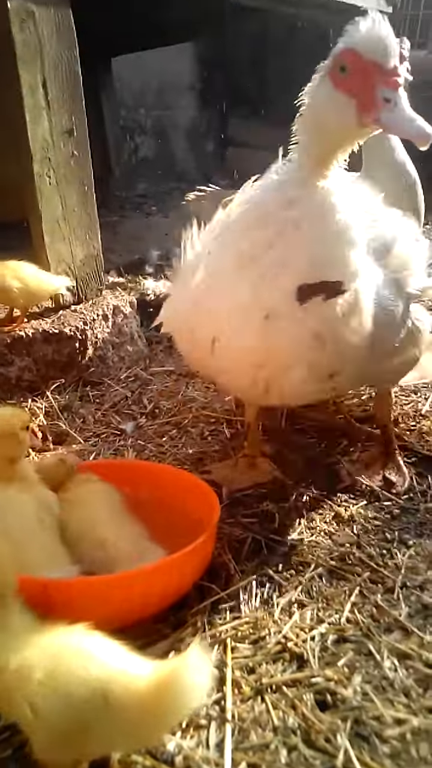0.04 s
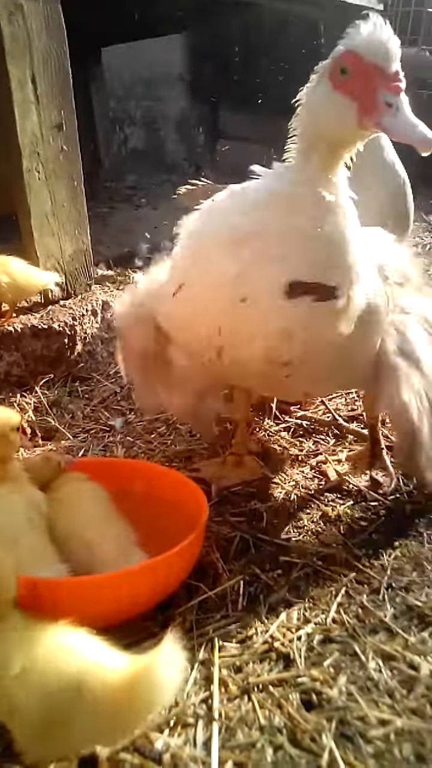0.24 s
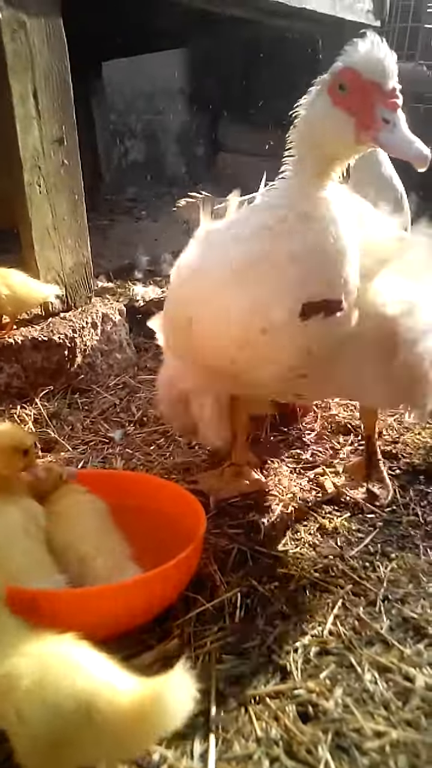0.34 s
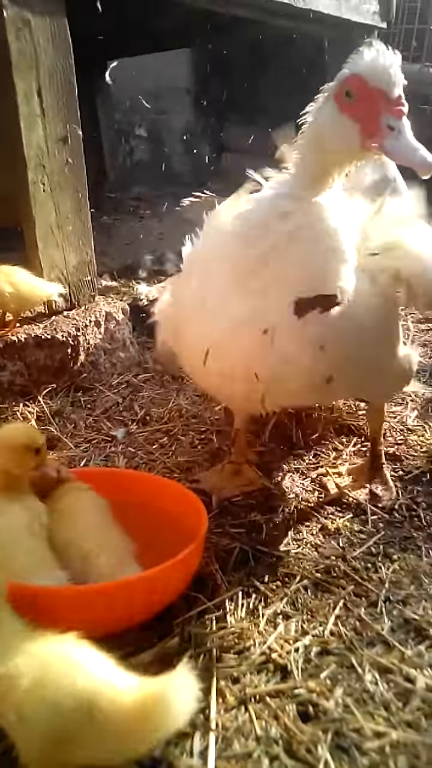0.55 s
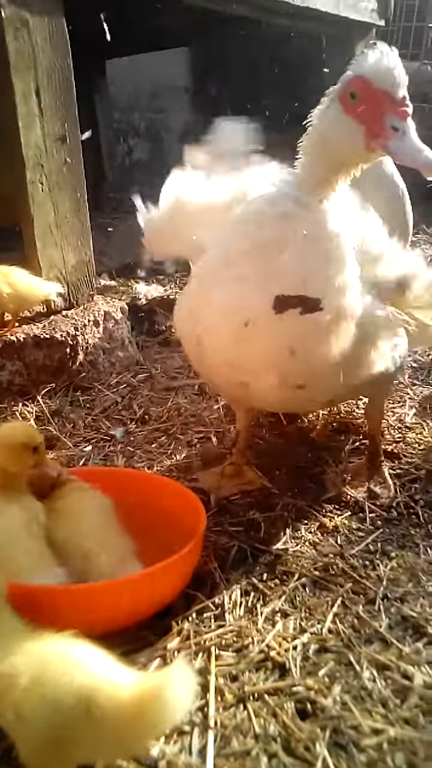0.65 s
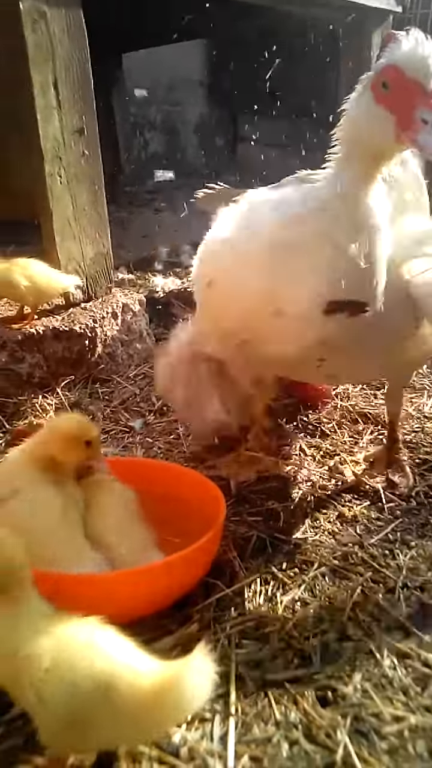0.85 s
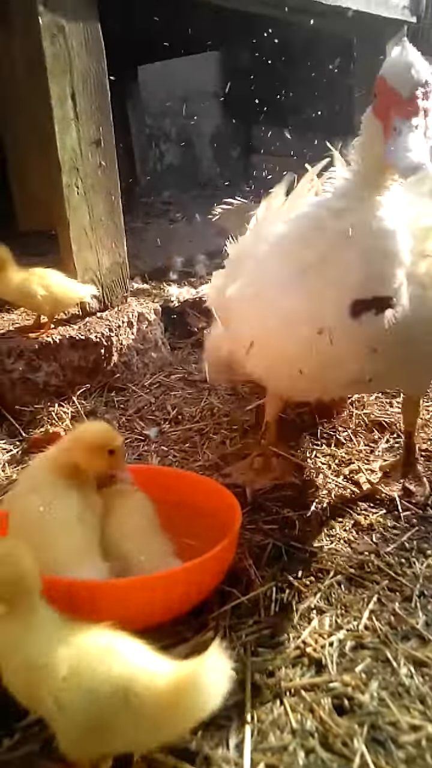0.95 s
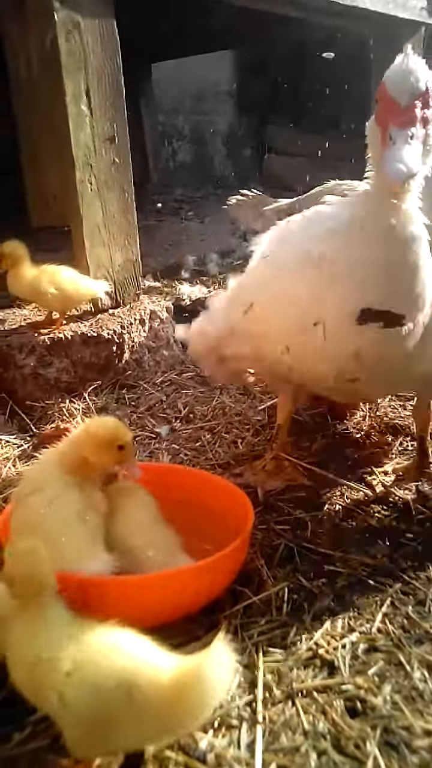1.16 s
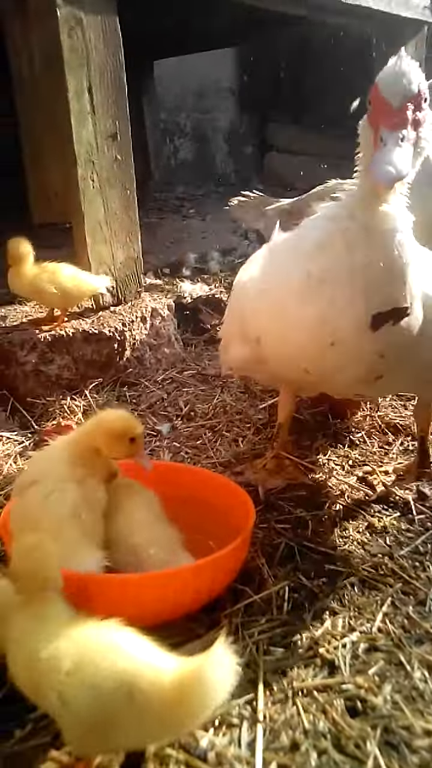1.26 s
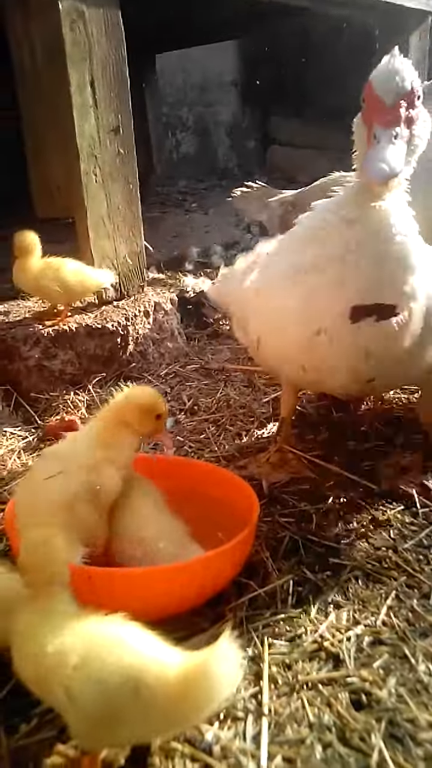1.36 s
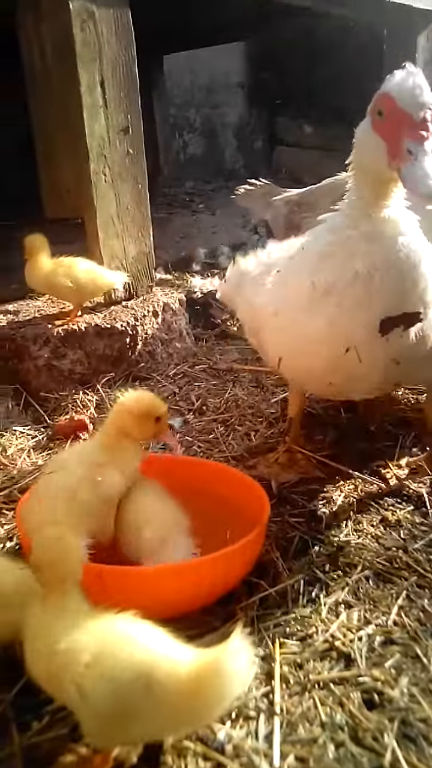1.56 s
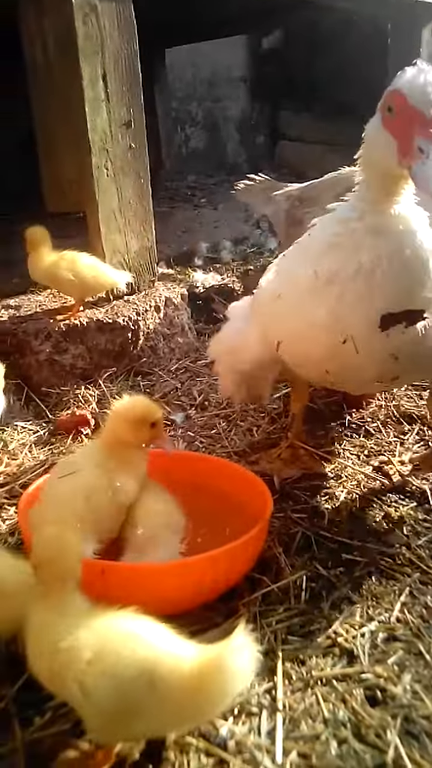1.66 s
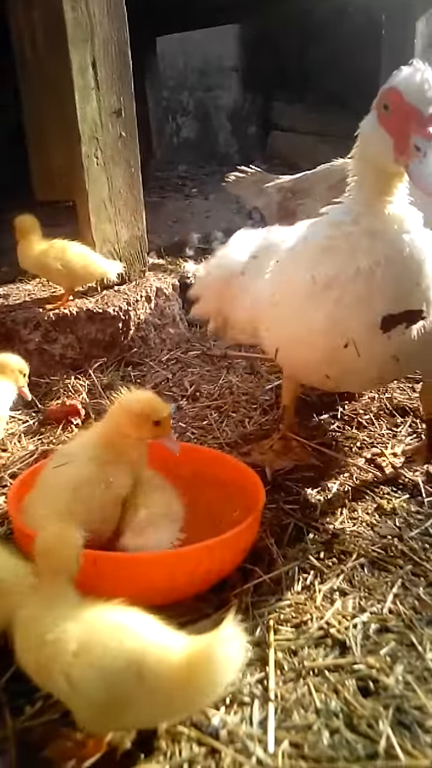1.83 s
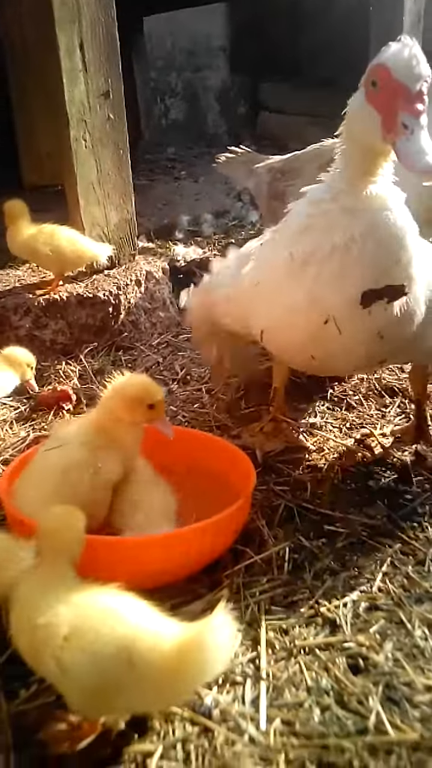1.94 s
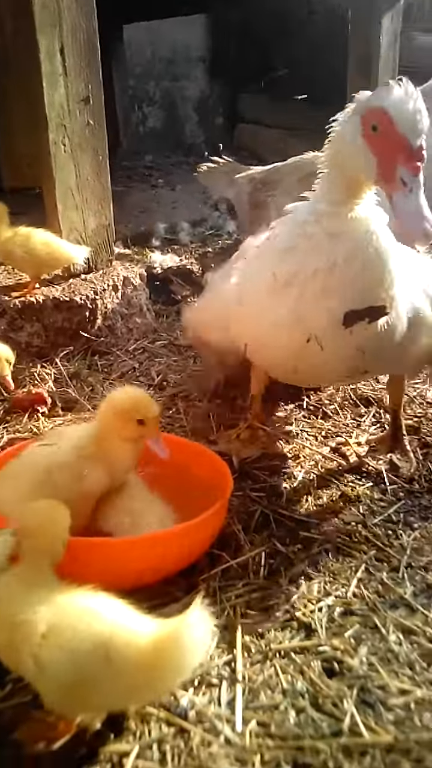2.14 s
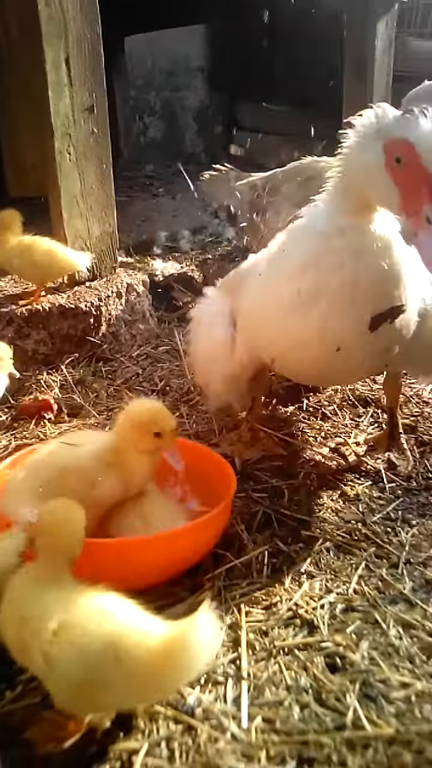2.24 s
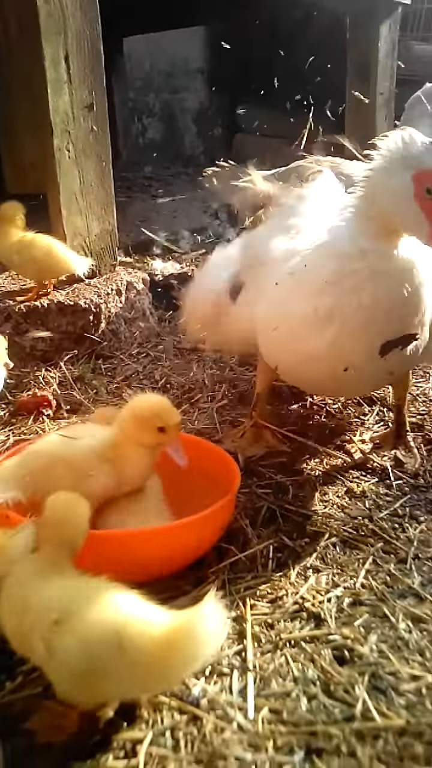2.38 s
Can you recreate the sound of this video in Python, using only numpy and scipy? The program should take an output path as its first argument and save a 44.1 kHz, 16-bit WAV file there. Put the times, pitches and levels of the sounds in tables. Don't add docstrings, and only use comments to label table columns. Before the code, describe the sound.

A large duck flaps close to a phone in an open, lightly echoing shed. From 0 to 1.3 s, ragged feathery slaps come rapidly, with wing brushes, straw rustle, dry snaps and low air puffs, strongest around 1 s. They die away by 1.7 s; a tiny rising gulp sounds at 1.8 s, with thin duckling peeps at 2.1-2.4 s and distant falling chick whistles. At 2.6 s a very loud, dead beak knock hits a plastic bowl, followed by a softer, lower tap at 2.75 s. Flapping builds again, hardest at 3.1-3.65 s, with a bright water drip at 3.1 s and a sharp one at 4.1 s. Weaker, slower flaps run from 4.5 to 5.2 s, with scattered flutters from 5.8 to 6.5 s. Soft peeps continue near 6.4-7 s. Another hard knock lands at 7.3 s, then small rustles, faint drips and steady outdoor hush until a last light flutter near 8.5 s.

```python
import sys
import numpy as np
from scipy import signal
from scipy.fft import rfft, irfft, next_fast_len
from scipy.io import wavfile
from scipy.ndimage import uniform_filter1d, map_coordinates

SR = 44100
rng = np.random.default_rng(int(sys.argv[2]) if len(sys.argv) > 2 else 0)


def convert_level_to_amplitude(level_db):
    exponent = np.asarray(level_db, float) / 20
    return 10 ** exponent


def store_wav(level_fs):
    pcm = np.round(np.clip(np.atleast_2d(level_fs), -1, 1) * 32767)
    wavfile.write(sys.argv[1], SR, pcm.T.astype(np.int16))


N = 374409
MEAN_FAN_DB = -60.5


def unit(x):
    return x / np.sqrt(np.mean(x ** 2) + 1e-20)


def along(points, hz):
    f, v = np.transpose(points)
    return np.interp(np.log(hz + 1), np.log(f + 1), v)


def curves(rows):
    s, *cols = np.transpose(rows)
    return [np.interp(np.arange(N) / SR, s, c) for c in cols]


def wobble(rate):
    knots = rng.standard_normal(int(N * rate / SR) + 4)
    return map_coordinates(knots, [np.arange(N) * rate / SR])


def add(track, s, x):
    part = track[max(round(s * SR), 0):][:len(x)]
    part += x[:len(part)]


def filtered(x, response):
    m = next_fast_len(N + SR // 2)
    return irfft(rfft(x, m) * response(np.fft.rfftfreq(m, 1 / SR)), m)[:N]


def dull(x):
    return signal.sosfilt(signal.butter(4, 5160, fs=SR, output="sos"), x)


def resonant(x, modes):
    def once(f):
        total = 0
        for k, (centre, width, db) in enumerate(modes):
            mode = 1j * f * width / (centre * centre - f * f + 1j * f * width)
            total = total + (-1) ** k * convert_level_to_amplitude(db / 2) * mode
        return total

    gain = np.sqrt(np.mean(np.abs(once(np.linspace(0, SR / 2, num=2000))) ** 4))
    return filtered(x, lambda f: once(f) ** 2 / gain)


def rustle(spectrum, grain_db, rate, patchy_db):
    grains = convert_level_to_amplitude(grain_db * wobble(rate)) * rng.standard_normal(N)
    z = signal.stft(grains, nperseg=256)[2]
    field = uniform_filter1d(rng.standard_normal(z.shape), size=4, axis=0)
    field = uniform_filter1d(field, size=9, axis=1)
    patched = signal.istft(z * convert_level_to_amplitude(patchy_db * unit(field)), nperseg=256)[1][:N]
    return unit(filtered(patched, lambda hz: convert_level_to_amplitude(along(spectrum, hz))))


def crackle(spectrum, rate, life_s, spread_db):
    size = convert_level_to_amplitude(spread_db * np.minimum(rng.exponential(size=N), 2.5))
    struck = (rng.random(N) < rate / SR) * size
    decays = signal.lfilter([1], [1, -np.exp(-1 / (life_s * SR))], struck)
    return unit(filtered(decays * rng.standard_normal(N), lambda hz: convert_level_to_amplitude(along(spectrum, hz))))


# (time [s], stirring of straw and feathers [dB], fanning of air [dB])
WORK = [(0.0, -53.5, -64.5), (0.5, -49, -58), (0.99, -48.5, -52), (1.28, -55, -64), (1.4, -59.5, -73),
        (2.22, -64.5, -72.5), (2.6, -57.5, -70), (3.0, -53.5, -65.5), (3.14, -49.5, -51.5),
        (3.52, -48, -57.5), (3.9, -58.5, -68.5), (4.25, -64, -70.5), (4.8, -59.5, -70),
        (5.32, -58.5, -63.5), (5.5, -63, -66.5), (5.9, -62, -66.5), (6.2, -63, -71), (8.49, -74.5, -73.5)]
# (time [s], length [s], more stirring [dB], more fanning [dB])
FOOT_SHUFFLES = [(0.108, 0.018, 4.5, 2), (1.652, 0.026, 0.5, 7), (2.356, 0.04, 3, 4),
                 (2.968, 0.027, 6.5, 9), (4.17, 0.099, 0.5, 4), (5.13, 0.021, 0, 8), (5.669, 0.034, 7, 6.5),
                 (5.798, 0.021, 13, 5), (6.636, 0.046, 8, 15), (7.0, 0.3, 3.5, 1), (7.476, 0.068, 6, 5.5),
                 (7.746, 0.069, 6.5, 1.5), (0.786, 0.049, 2, -4), (5.99, 0.13, 8, 2)]


def effort():
    t = np.linspace(0, N / SR, num=2000)
    swells = 0
    for s, length, *more_db in FOOT_SHUFFLES:
        swells = swells + np.outer(more_db, np.exp(-((t - s) / length) ** 2))
    return np.array(curves(WORK)) + curves(np.c_[t, swells.T])


# (frequency [Hz], level per Hz [dB])
STRAW_COLOUR = [(820, -37), (1400, 1.5), (1620, -3), (2250, 2.5), (3250, 2.5), (3620, -2), (5060, -13),
                (6150, -22), (9000, -43.5), (11700, -64.5), (19800, -120)]
# (frequency [Hz], level per Hz [dB])
STALK_COLOUR = [(150, -44.5), (250, -8), (420, -3.5), (750, 0), (980, 5), (1200, 1.5), (1500, -17.5),
                (2100, -50), (3500, -120)]
# (frequency [Hz], level per Hz [dB])
FIZZ_COLOUR = [(3530, -21), (6000, 7.5), (7520, -8), (11000, -7), (12200, -8.5), (14800, -7),
               (16000, -27.5)]
# (frequency [Hz], level per Hz [dB])
PUSH_COLOUR = [(15, -62), (25, -16.5), (43, -12), (135, 5), (194, 0.5), (259, -7.5), (300, -35.5),
               (390, -49), (660, -120)]


def straw():
    mid_db, air_db = effort()
    mid_db = mid_db + 1.5 * wobble(14) * np.clip((mid_db + 70) / 12, 0, 1)
    low_db = -4 + mid_db.mean() + 1.17 * (mid_db - mid_db.mean())
    stir = np.clip((mid_db + 74.5) / 15, .15, 1) * wobble(40)
    mid = rustle(STRAW_COLOUR, grain_db=2.5, rate=300, patchy_db=3.6)
    mid = mid + .5 * crackle(STRAW_COLOUR, rate=200, life_s=.002, spread_db=2.5)
    low = rustle(STALK_COLOUR, grain_db=2.5, rate=150, patchy_db=3.6)
    low = low + .6 * crackle(STALK_COLOUR, rate=60, life_s=.004, spread_db=3)
    fizz_gain = convert_level_to_amplitude(-82.0) + convert_level_to_amplitude(2.0 * (mid_db + 55.0) - 87.0 + 1.4 * stir)
    fizz = fizz_gain * rustle(FIZZ_COLOUR, grain_db=-1.0, rate=480, patchy_db=1.5)
    rumble = convert_level_to_amplitude(air_db - 1.0) * rustle(PUSH_COLOUR, grain_db=0.5, rate=15, patchy_db=0.5)
    return convert_level_to_amplitude(mid_db - 3.0 + 1.9 * stir) * mid + convert_level_to_amplitude(low_db - 3.0 + 2.0 * stir) * low + fizz + rumble


# (frequency [Hz], level per Hz [dB])
HUSH_COLOUR = [(150, -31), (250, -9.5), (469, -9), (537, -9), (633, -17.5), (894, -9), (1020, -12.5),
               (4010, -15.5), (5020, -16), (9000, -37.5), (11700, -64), (19800, -120)]


def yard():
    fan_db = 0.53 * (effort()[1] - MEAN_FAN_DB)
    settle_db = -9 * (np.arange(N) > 7.6 * SR)
    low_hum = unit(resonant(rng.standard_normal(N), [(1010, 82, 0)]))
    low_hum = convert_level_to_amplitude(-71.0 + fan_db + settle_db + 3.2 * wobble(9)) * low_hum
    high_hum = unit(resonant(rng.standard_normal(N), [(2620, 220, 0)]))
    high_hum = convert_level_to_amplitude(-79.0 + 3.4 * wobble(4.6)) * high_hum
    return convert_level_to_amplitude(-71.5) * rustle(HUSH_COLOUR, grain_db=-3.0, rate=20, patchy_db=1.0) + low_hum + high_hum


def whistles(calls, flutter_db, waver):
    out, shake = np.zeros(N), 1 + waver * wobble(200)
    for s, length, start_hz, mid_hz, end_hz, db in calls:
        u = np.linspace(0, 1, int(length * SR))
        hz = 2 * (u - .5) * ((u - 1) * start_hz + u * end_hz) + 4 * u * (1 - u) * mid_hz
        hz = hz * shake[round(s * SR):][:len(u)]
        swell = np.sin(np.pi * u ** .8) ** .35
        add(out, s, convert_level_to_amplitude(db) * swell * np.sin(2 * np.pi * np.cumsum(hz) / SR))
    return out * convert_level_to_amplitude(flutter_db * wobble(260))


# (time [s], length [s], start pitch [Hz], end pitch [Hz], level [dB])
CHICK_CALLS = [(0.0, .08, 4250, 3250, -51), (.15, .07, 4150, 3950, -56), (.96, .04, 4100, 3950, -51),
               (1.24, .07, 4100, 4000, -53), (1.3, .07, 3800, 3100, -55), (1.748, .047, 4250, 3700, -50),
               (1.79, .045, 2850, 3400, -55), (2.47, .08, 4100, 3950, -56), (2.648, .095, 4750, 3450, -53),
               (4.562, .05, 4200, 3850, -59), (4.6, .05, 3900, 3000, -59), (4.63, .08, 3150, 2700, -64),
               (4.8, .04, 4200, 4000, -66), (1.83, .035, 3300, 2550, -59), (6.29, .05, 4050, 3850, -59),
               (6.36, .05, 3250, 2900, -62), (6.335, .07, 3750, 3550, -64), (6.775, .06, 2130, 2100, -62),
               (6.955, .04, 4100, 4000, -56), (6.99, .07, 3850, 2900, -56), (7.79, .055, 4120, 3850, -60),
               (7.83, .05, 3950, 3050, -59), (7.86, .085, 3550, 2800, -62), (8.125, .04, 1900, 2150, -74),
               (8.08, .12, 1330, 1280, -77)]


def chick():
    sag = .62
    calls = [(s, length, a, a + sag * (b - a), b, db) for s, length, a, b, db in CHICK_CALLS]
    return whistles(calls, flutter_db=5, waver=.028)


# (time [s], peak level [dB], feather hiss [dB], quill ring [Hz])
FIRST_BOUT = [(.005, -30, -12, 3500), (0.1444, -29, -9, 2850), (0.2737, -25, -9, 3440),
              (0.3474, -26, -36, 2150), (0.3967, -24.5, -17, 2200), (0.476, -27, -22.5, 2830),
              (0.532, -25, -8.5, 3000), (0.607, -27, -31, 2430), (0.636, -25.5, -19.5, 2130),
              (0.6582, -20, -8.5, 2150), (0.7378, -31, -20, 2460), (0.7678, -29, -19, 2890),
              (0.7823, -21, -8.5, 3150), (0.8956, -22.5, -14.5, 2980), (.914, -19.5, -13.5, 2740),
              (1.023, -24, -17, 2530), (1.0431, -17, -25, 2600), (1.156, -24, -27, 1960),
              (1.1756, -22, -17.5, 2440), (1.324, -25.5, -15, 2530), (1.479, -40.5, -8, 2800),
              (1.6754, -42, -11, 2670)]
# (time [s], peak level [dB], feather hiss [dB], quill ring [Hz])
SECOND_BOUT = [(2.27, -43, -10, 2780), (2.4372, -36.5, 2, 3230), (2.5692, -31.5, -11.5, 3100),
               (2.7171, -33.5, -0.5, 3630), (2.805, -29.5, -43, 2820), (2.813, -27, -24, 2600),
               (2.93, -19, -17, 2900), (2.9835, -24, -8.5, 3640), (3.05, -27.5, -14.5, 2900),
               (3.0688, -23.5, -28.5, 2430), (3.09, -24.5, -11, 1800), (3.1049, -18, -20.5, 2210),
               (3.2184, -29, -18.5, 2450), (3.2296, -14, -18, 2660), (3.3473, -26.5, -12.5, 2780),
               (3.364, -16, -17.5, 2360), (3.4962, -18, -13.5, 2240), (3.6261, -26.5, -22, 1850),
               (3.6464, -19, -14, 2440), (3.775, -56, -41.5, 2740), (3.835, -25.5, -10, 2510),
               (4.013, -38.5, -4, 3220), (4.0278, -37.5, -49, 2100), (4.2036, -41, -10, 3270)]
# (time [s], peak level [dB], feather hiss [dB], quill ring [Hz])
THIRD_BOUT = [(4.451, -35.5, -22, 2440), (4.5262, -50, -38, 1790), (4.558, -33.5, -8, 3050),
              (4.7293, -30.5, -6, 2390), (4.893, -28, -10, 2580), (5.0582, -25.5, -10.5, 2280),
              (5.2164, -25, -10.5, 2970), (5.83, -25, -20, 2270), (5.898, -42, -12, 2620),
              (5.9886, -30, -20, 2570), (6.0442, -47, -36, 1670), (6.142, -28.5, -21, 2600),
              (6.3361, -30, -17, 2380), (6.5286, -35.5, -13, 2400), (6.877, -45, -43, 2930),
              (7.481, -45, -1.5, 3040), (7.6891, -42, -50.5, 2600), (8.4767, -35, -26, 2550)]
# (time [s], peak level [dB], body level [dB])
FLANK_BRUSHES = [(.213, -33, -8), (0.3188, -37, -3.5), (0.438, -33, -1), (0.578, -52, -17), (.707, -58, 1),
                 (0.8377, -32, -5.5), (0.9611, -28, -6.5), (1.084, -33, -5.5), (1.133, -41, 0),
                 (1.2546, -46, -12), (1.2962, -45, 2), (3.3003, -34, -21), (3.434, -39.5, 1),
                 (3.465, -33, -24), (3.702, -33, -8.5), (4.1662, -39, -9), (5.1281, -45.5, 2),
                 (5.157, -44, -0.5), (5.1986, -55, 11), (5.284, -39.5, 0.5), (5.3224, -41, -5),
                 (5.439, -56.5, 11.5), (5.489, -43, -4.5), (5.7819, -34, -6), (5.8823, -46.5, 7),
                 (6.206, -43, 0.5), (6.399, -41, -2), (6.9778, -45.5, -3.5), (7.7608, -48, -9),
                 (8.4661, -43, -3)]


def contacts():
    fan_db = 0.85 * (curves(WORK)[1] - MEAN_FAN_DB)
    bouts = [(FIRST_BOUT, -12.5, -24.5), (SECOND_BOUT, -15.5, -20), (THIRD_BOUT, -16.5, -28)]  # body, air dB
    rows = []
    for bout, body_db, air_db in bouts:
        for s, db, hiss_db, hz in bout:
            softer_body_db = body_db - 0.057 * (db + 28.5)
            rows.append((s, db, hiss_db, softer_body_db, air_db + fan_db[round(s * SR)], hz))
    spread = [(0.00058, 0.0013, 0.014, 0.5, 0.5, 0)] * len(rows)
    rows += [(s, db, -41, body_db, -15, 2450) for s, db, body_db in FLANK_BRUSHES]
    spread += [(0.00021, 0.0042, 0.5, 0, 0.5, 180)] * len(FLANK_BRUSHES)
    return rows + spread * rng.uniform(-1.7, 1.7, np.shape(rows))


# (frequency [Hz], width [Hz], level [dB])
QUILL_MODES = [(2600, 4660, 5), (4470, 3040, 9), (6570, 3360, -12.5)]
# (frequency [Hz], width [Hz], level [dB])
BODY_MODES = [(526, 273, -3), (1060, 840, 6)]
# (frequency [Hz], width [Hz], level [dB])
HISS_MODES = [(6800, 1380, -2.5), (9520, 2500, -0.5), (13900, 5900, -4.5)]
# (frequency [Hz], width [Hz], level [dB])
THUMP_MODES = [(128, 110, 8.5), (426, 142, 9)]
# (time [s], barb pitch [Hz])
BARB_PITCH = [(0.0, 12400), (1.04, 11200), (1.98, 8140), (2.15, 8360), (2.48, 12800), (2.65, 7380),
              (2.67, 10900), (3.07, 13050), (4.4, 9200), (4.42, 12300), (4.99, 9310), (5.01, 13200),
              (5.46, 7900), (5.84, 10900), (7.35, 7510), (7.47, 12500), (7.61, 8210), (8.49, 8430)]


def wings():
    quill, body, hiss, ring, air = np.zeros((5, N))
    t, lead, barbs_hz = np.arange(SR // 8) / SR, SR // 50, curves(BARB_PITCH)[0]
    for s, db, hiss_db, body_db, air_db, hz in contacts():
        white = rng.standard_normal((6, len(t)))
        ragged = convert_level_to_amplitude(4.5 * unit(uniform_filter1d(white[4], size=30)))
        crack = 1.57 * (1 - np.exp(-t / 0.0016)) * convert_level_to_amplitude(-60 * t / 0.015)
        blow = crack + ragged * convert_level_to_amplitude(-9.5 - 60 * t / 0.054) * (1 - np.exp(-t / 0.0053))
        burst = convert_level_to_amplitude(db) * (blow + ragged * convert_level_to_amplitude(-33.5 - 60 * t / 0.54))
        add(quill, s, convert_level_to_amplitude(-10.5) * burst * white[0])
        add(body, s, convert_level_to_amplitude(body_db + 0.5) * burst * white[1])
        fade = convert_level_to_amplitude(-60 * t / 0.019) + convert_level_to_amplitude(-25.0 - 60 * t / 0.053)
        fray = ragged * (1 - np.exp(-t / 0.00077)) * fade * white[2]
        barb_hz = barbs_hz[round(max(s, 0) * SR)] * rng.uniform(1.0, 1.3)
        fray = fray + 1.93 * signal.lfilter(*signal.iirpeak(barb_hz, 3.5, SR), fray)
        add(hiss, s, convert_level_to_amplitude(db + hiss_db - 10.5) * fray)
        before = t[lead::-1]
        add(hiss, s - lead / SR, convert_level_to_amplitude(db + hiss_db - 38.5 - 60 * before / 0.04) * white[4, :lead + 1])
        add(quill, s - lead / SR, convert_level_to_amplitude(db - 26.5 - 60 * before / 0.03) * white[5, :lead + 1])
        add(ring, s, convert_level_to_amplitude(5.5) * signal.lfilter(*signal.iirpeak(hz, 3.5, SR), burst * white[3]))
        thump = convert_level_to_amplitude(db + air_db - 3 - 60 * t / 0.06) * (1 - np.exp(-t / 0.00095))
        add(air, s, thump * white[5])
    slaps = resonant(quill, QUILL_MODES) + resonant(body, BODY_MODES)
    return slaps + resonant(hiss, HISS_MODES) + resonant(air, THUMP_MODES) + dull(ring)


# (time [s], level [dB], ring [Hz])
STALK_TICKS = [(0.082, -39, 2840), (0.378, -37, 1080), (0.505, -35, 940), (0.707, -33, 1300),
               (0.79, -22.5, 2770), (0.933, -32, 2620), (1.146, -35, 2450), (1.258, -35, 2450),
               (1.297, -44, 3730), (8.476, -35, 2030), (1.913, -43.5, 1100), (2.13, -42, 2840),
               (2.34, -47.5, 2680), (2.403, -43, 3070), (2.46, -52, 2630), (2.481, -40, 3980),
               (2.517, -41, 2390), (2.7, -38, 3880), (2.806, -33, 2800), (2.958, -33, 2900),
               (3.053, -30, 2920), (3.107, -21.5, 2390), (3.149, -33, 2760), (3.276, -39, 880),
               (3.302, -35.5, 3160), (3.435, -41, 840), (3.483, -36, 3500), (3.4972, -17.5, 2200),
               (3.605, -33, 2520), (3.653, -26, 2500), (3.713, -44, 905), (3.771, -40, 2260),
               (3.778, -35, 2760), (3.893, -39.5, 1990), (4.017, -38, 3080), (4.031, -30, 2270),
               (4.079, -43, 1830), (4.457, -57, 2500), (4.489, -48, 2500), (4.526, -44, 1860),
               (4.61, -44, 3820), (4.712, -50.5, 2540), (4.73, -32, 2300), (8.477, -45, 3220),
               (4.967, -44.5, 1400), (8.478, -36, 1050), (5.199, -46.5, 1070), (5.52, -48, 990),
               (5.66, -43, 2260), (5.808, -42, 1850), (5.882, -39, 660), (5.904, -45, 1010),
               (5.952, -42, 2050), (7.484, -44, 990), (6.146, -34, 2710), (6.698, -53, 2900),
               (6.778, -46, 2580), (6.828, -45, 2670), (6.925, -57, 2910), (6.968, -49, 3900)]


def ticks():
    out, t = np.zeros(N), np.arange(SR // 40) / SR
    shape = (1 - np.exp(-t / 0.00066)) * convert_level_to_amplitude(-60 * t / 0.017)
    for s, db, hz in STALK_TICKS:
        white = rng.standard_normal((2, len(t))) * shape
        ring = unit(signal.lfilter(*signal.iirpeak(hz, 9.4, SR), white[0]))
        crack = 0.33 * unit(uniform_filter1d(white[1], size=4))
        add(out, s - .0012, convert_level_to_amplitude(db - 17.5) * (ring + crack))
    return dull(out)


# (time [s], level [dB],
# pitch [Hz])
WING_PUFFS = [(0.1, -45, 166), (0.215, -57, 144), (0.253, -57, 174), (0.533, -50.0, 107), (0.617, -48, 137),
              (0.648, -49, 185), (0.778, -37.5, 171), (0.844, -41, 131), (0.902, -39, 145),
              (1.028, -47, 167), (1.163, -42, 142), (1.236, -49.5, 138), (1.619, -55, 142),
              (1.903, -63, 137), (2.398, -57, 135), (2.609, -64, 300), (2.768, -58.5, 134),
              (2.966, -45, 127), (3.114, -35.5, 177), (3.236, -42, 177), (3.361, -43, 125),
              (3.507, -43.5, 126), (3.649, -48, 156), (3.715, -52, 196), (4.077, -52.5, 216),
              (4.146, -57, 148), (4.201, -53, 144), (4.565, -63, 196), (4.654, -57, 127), (4.969, -58, 154),
              (5.139, -57, 137), (5.249, -50.5, 139), (5.288, -59, 220), (5.444, -52, 164),
              (5.655, -50.5, 160), (5.815, -50, 156), (5.906, -61, 212), (5.939, -56, 186),
              (6.019, -55, 157), (6.208, -68, 164), (6.64, -56, 130), (6.708, -55, 135), (6.846, -59, 145),
              (6.887, -58, 120), (7.331, -59, 298), (7.422, -56, 135), (7.822, -59, 115),
              (7.875, -64, 133.7), (8.28, -62, 110), (8.478, -54.5, 130)]


def puffs():
    out, t = np.zeros(N), np.arange(-SR // 20, SR // 20) / SR
    swell = np.exp(-(t / 0.011) ** 2)
    for s, db, hz in WING_PUFFS:
        turn, glide = rng.standard_normal(2)
        cycles = np.sin(2 * np.pi * (hz * t * (1 + 7 * glide * t) + turn))
        add(out, s + t[0], convert_level_to_amplitude(db - 1.5) * swell * cycles)
    return out


# (time [s], peak level [dB], pitch [Hz])
SHARP_SNAPS = [(.4324, -35, 3100), (.587, -33, 700), (.865, -39, 3500), (1.0435, -19, 2000),
               (1.2317, -36, 1300), (1.39, -36, 1800), (1.0446, -16, 3200), (3.0911, -36, 6000),
               (3.4962, -18, 1500), (3.351, -38, 6800), (3.3632, -17, 1870), (3.5435, -42, 3200),
               (5.131, -35, 1000), (5.2, -48, 1300), (5.2865, -38, 478), (5.882, -37, 750),
               (7.762, -42, 1300), (7.972, -59, 2400)]


def snaps():
    out, t = np.zeros(N), np.arange(SR // 50) / SR
    for s, db, hz in SHARP_SNAPS:
        decay = convert_level_to_amplitude(db + 1 - 60 * t * hz / 5)
        add(out, s, -decay * np.sin(2 * np.pi * hz * t))
    return signal.sosfilt(signal.butter(2, 250, "high", fs=SR, output="sos"), out)


# (time [s], length [s], start pitch [Hz], end pitch [Hz], level [dB])
BOWL_GULPS = [
    (1.799, .053, 530, 1100, -40),
    (1.8, .022, 1050, 1150, -56),
    (1.923, 0.021, 980, 780, -49),
    (1.92, .024, 1250, 1200, -56),
]
# (time [s], length [s], top pitch [Hz], level [dB])
ARCHED_PEEPS = [
    (2.133, 0.048, 2900, -46),
    (2.246, .054, 3000, -47.5),
    (2.43, 0.025, 3080, -43),
    (3.556, 0.048, 3030, -46),
    (6.418, .05, 2800, -47.5),
    (6.565, 0.046, 2840, -49),
]
# (time [s], length [s], top pitch [Hz], level [dB])
EAGER_PEEPS = [
    (6.862, .034, 3000, -52),
    (6.914, .023, 3050, -50),
    (6.99, .021, 3050, -52),
]


def ducklings():
    calls = []
    for rows, shape in ((ARCHED_PEEPS, (.83, 1, .76)), (EAGER_PEEPS, (.83, .95, 1))):
        for s, length, top_hz, db in rows:
            calls.append((s, length, *(top_hz * np.array(shape)), db))
    for s, length, a, b, db in BOWL_GULPS:
        mid_hz = .87 * min(a, b) + .13 * max(a, b)
        calls.append((s, length, a, mid_hz, b, db))
    return whistles(calls, flutter_db=2.5, waver=.011)


# (time [s], peak level [dB], bubble pitch [Hz], time to fall 60 dB [s])
BOWL_DROPS = [
    (2.373, -40.5, 987, 0.045),
    (2.641, -38.5, 690, 0.06),
    (3.1255, -17, 2880, 0.019),
    (3.939, -34.5, 3000, 0.03),
    (4.057, -25, 2700, 0.018),
    (4.108, -13.5, 2840, 0.0089),
    (8.054, -45.5, 3470, 0.015),
    (8.121, -52, 1890, 0.038),
    (8.312, -44.5, 2240, 0.039),
    (8.311, -48.5, 1710, 0.081),
]


def drops():
    out, t = np.zeros(N), np.arange(SR // 10) / SR
    for s, db, hz, t60 in BOWL_DROPS:
        shiver = 0.47 * unit(uniform_filter1d(rng.standard_normal(len(t)), size=60))
        envelope = convert_level_to_amplitude(db - 60 * t / t60) * (1 - np.exp(-t / .0006)) ** 2
        add(out, s, envelope * np.sin(2 * np.pi * hz * t * (1 + 1.2 * t) + shiver))
    return dull(out)


# (time [s], peak level [dB], pitch ratio [1], pitch cancelled by the water's mirror [Hz])
BEAK_KNOCKS = [
    (2.605, -1, 1.005, 3320),
    (2.761, -16, 0.76, 2190),
    (7.328, -5.5, 0.82, 3480),
]
# (frequency [Hz], level per Hz [dB])
RIM_COLOUR = [(88, -39), (150, -27), (810, 1), (1400, 4), (1920, 2), (2630, 0), (3310, 0.5), (5200, -14.5),
              (6000, -19), (7000, -33), (8540, -42.5), (10000, -58), (13000, -89), (22000, -120)]


def knocks():
    out, hz = np.zeros(N), np.fft.rfftfreq(2048, 1 / SR)
    for s, db, ratio, notch_hz in BEAK_KNOCKS:
        mirrored = np.abs(1 + .88 * np.exp(1j * np.pi * hz / notch_hz))
        colour = convert_level_to_amplitude(np.maximum(along(RIM_COLOUR, hz / ratio), -70))
        cepstrum = irfft(np.log(mirrored * colour))
        cepstrum = cepstrum * np.r_[1, np.full(1023, 2), 1, np.zeros(1023)]
        click = irfft(np.exp(rfft(cepstrum)))[:1024]
        click = convert_level_to_amplitude(db - 4.5) * click / np.abs(click).max()
        add(out, s + .002, click)
        add(out, s + .0045, convert_level_to_amplitude(-23) * uniform_filter1d(click, size=9))
    return out


# (frequency [Hz], time to fall 60 dB [s])
SHED_DECAY = [(300, 0.18), (3000, 0.19), (12000, 0.11)]


def shed(x, size=1):
    hz, t, z = signal.stft(rng.standard_normal(SR // 2), SR, nperseg=256)
    fade = convert_level_to_amplitude(-60 * t / (size * along(SHED_DECAY, hz)[:, None]))
    tail = signal.istft(z * fade, SR, nperseg=256)[1]
    return signal.fftconvolve(np.pad(x, (300, 0)), tail / np.linalg.norm(tail))[:N]


def scene():
    flaps, beak, drip = wings() + ticks() + snaps(), knocks(), drops()
    near, far = ducklings(), chick()
    sent = convert_level_to_amplitude(-17) * flaps + convert_level_to_amplitude(-2) * np.gradient(near)
    sent = sent + convert_level_to_amplitude(-19) * drip + convert_level_to_amplitude(-25) * np.gradient(beak)
    echo = shed(sent)
    far = .75 * far + .52 * shed(far, size=.8) + .52 * shed(far, size=1.8)
    return (flaps + near + drip + far + beak + echo + straw() + puffs() + yard())[None]


def band_limit(x):
    return signal.sosfilt(signal.butter(12, 16810, fs=SR, output="sos"), x)


def record(dry):
    mix = filtered(dry[0], lambda hz: np.where(hz < 15500, 1, convert_level_to_amplitude(-12.0)) * (hz < 16700))[None]
    return band_limit(mix)


dry = scene()
out = record(dry)
store_wav(out)
```